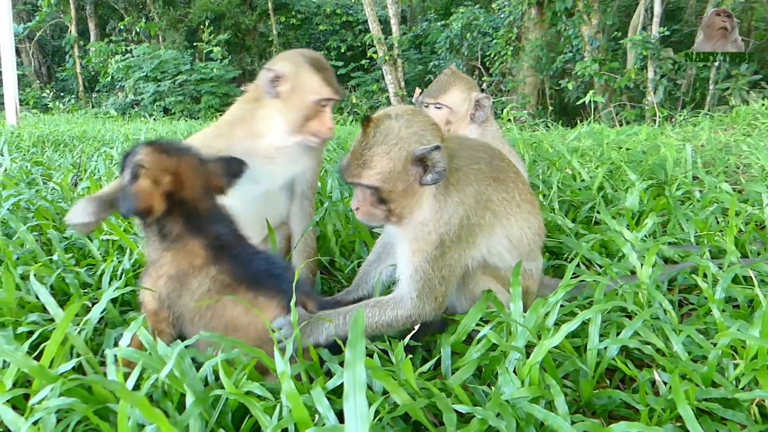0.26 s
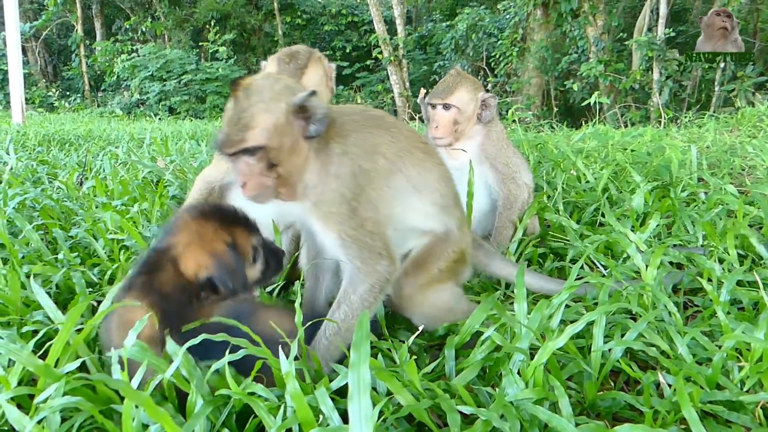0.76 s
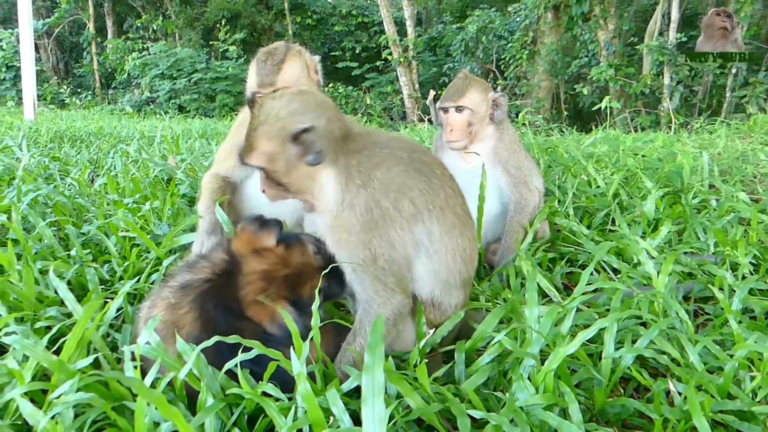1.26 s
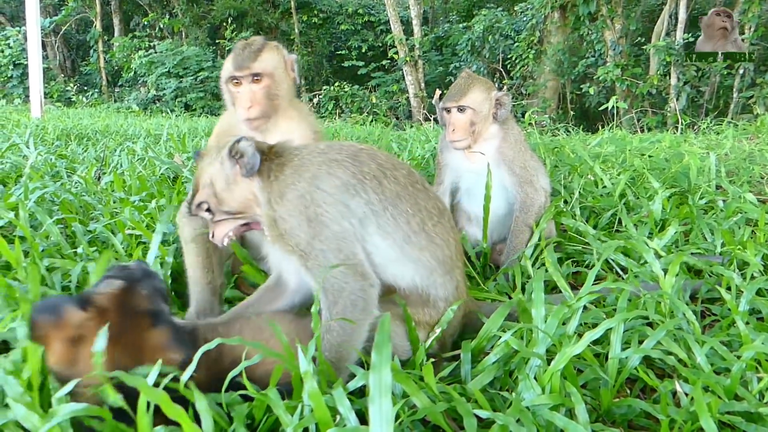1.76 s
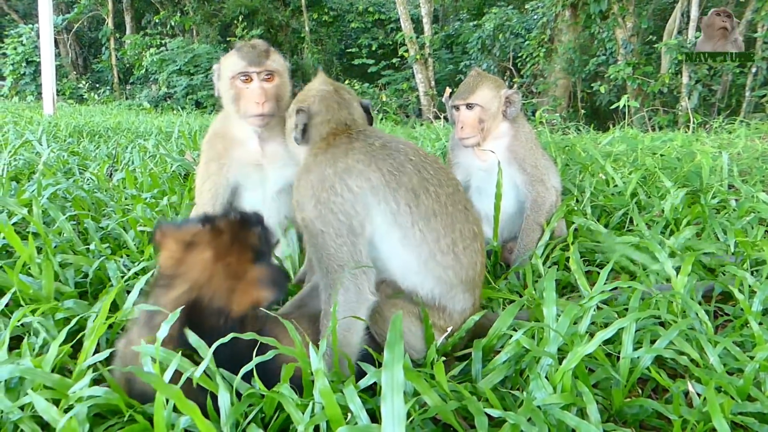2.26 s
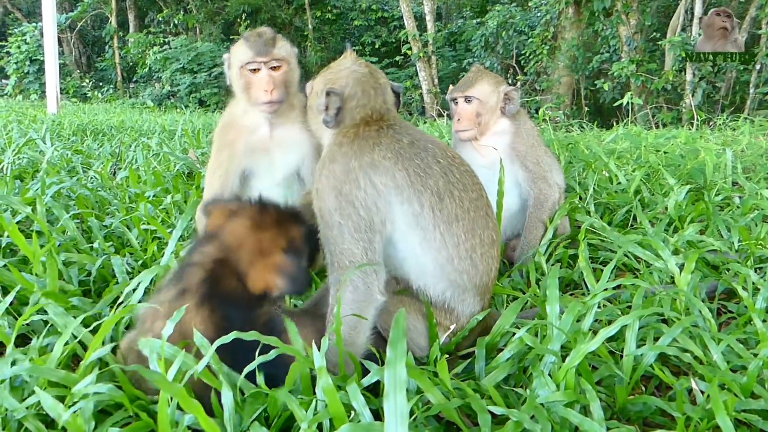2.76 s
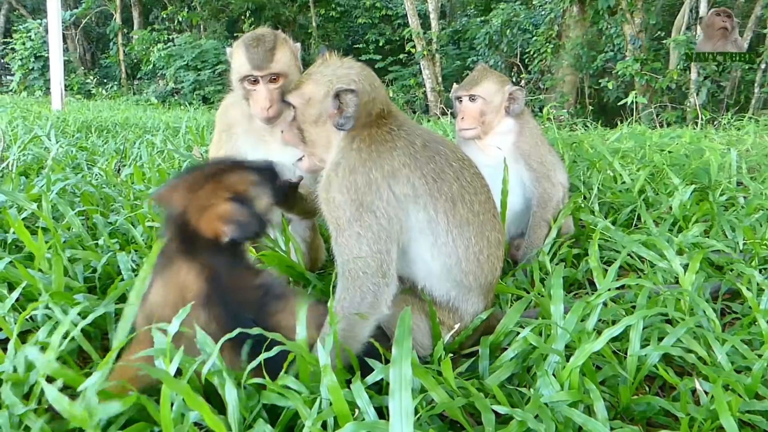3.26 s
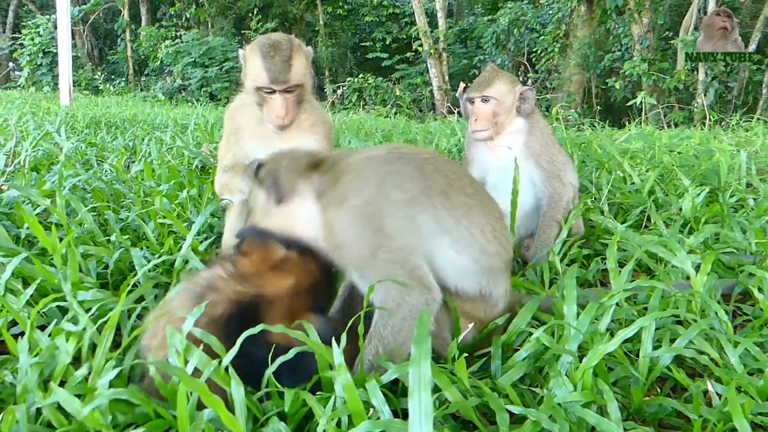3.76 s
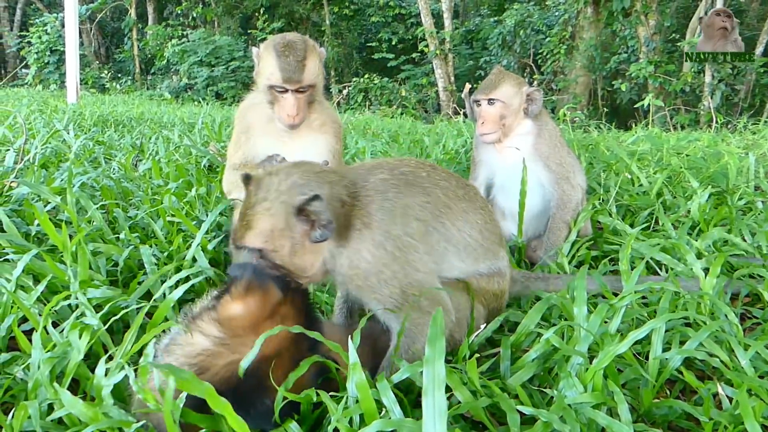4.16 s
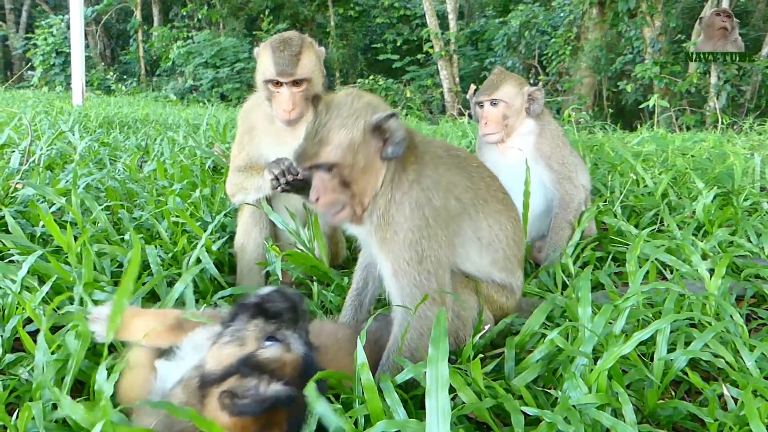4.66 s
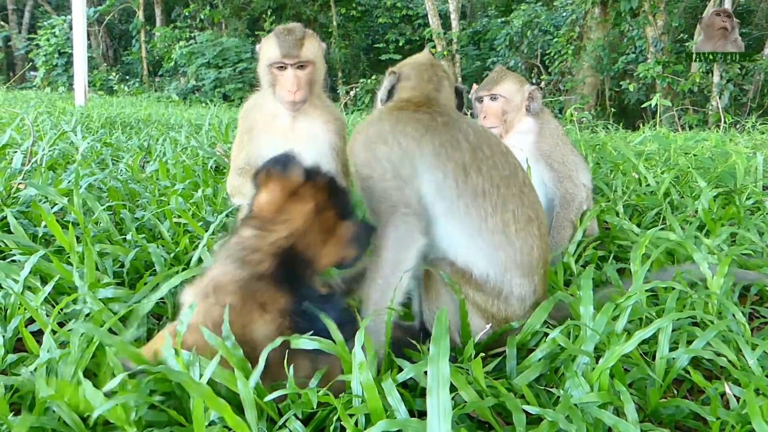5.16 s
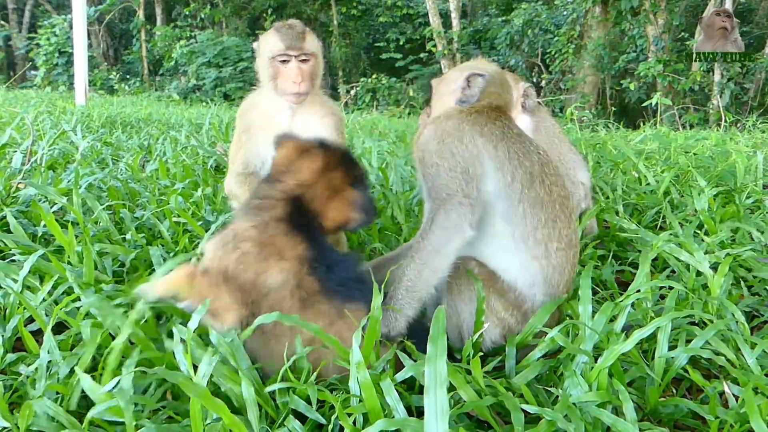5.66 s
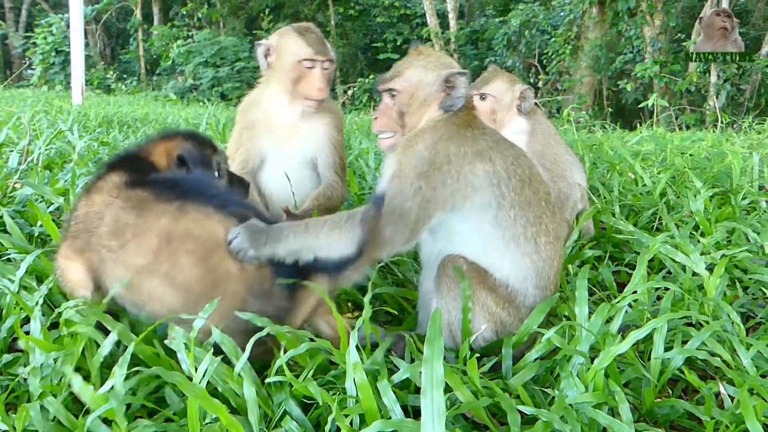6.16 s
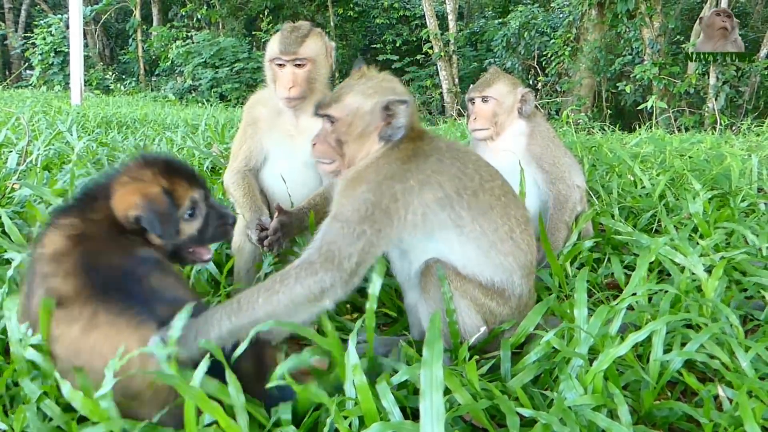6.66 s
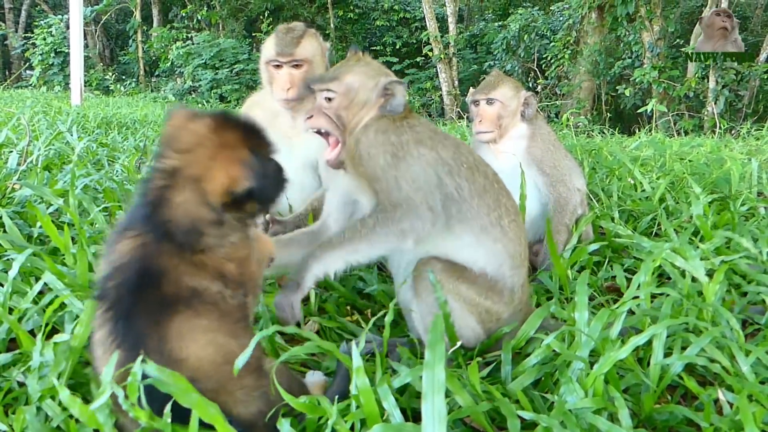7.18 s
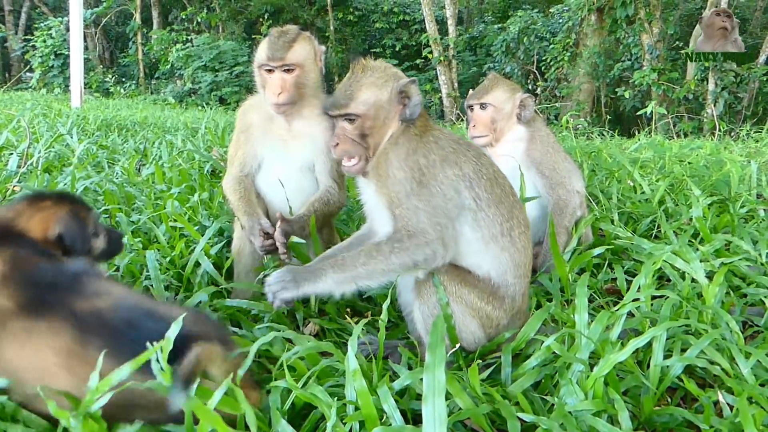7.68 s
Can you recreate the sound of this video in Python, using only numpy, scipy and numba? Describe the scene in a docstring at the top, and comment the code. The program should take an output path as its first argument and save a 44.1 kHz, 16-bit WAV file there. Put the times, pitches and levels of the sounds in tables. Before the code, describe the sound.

Close puppy moans, whines, growls and gives three sharp yelps in rustling grass, with motorbikes, a distant tooting horn and road rumble behind.

```python
"""Long grass before a belt of trees: a puppy tussling with monkeys whines, growls and yelps three times, close.
Its cries are vocal-fold pulses ringing throat, mouth and muzzle; the trees return them as scattered noise.
Beyond the trees, stacks of harmonics make motorbikes and a tooting horn, and shaped noise makes the road.
Noise bursts rustle the grass, narrow-band noise buzzes as insects, and a falling tone is one bird's peep.
The recorder's limiter clamps loud cries, so the background ducks after each yelp and swells back."""
import sys
import numpy as np
from scipy import signal
from scipy.fft import rfft, irfft
from scipy.io import wavfile
from scipy.ndimage import uniform_filter1d, minimum_filter1d
from numba import njit

SR = 44100
rng = np.random.default_rng(int(sys.argv[2]) if len(sys.argv) > 2 else 0)


def inscribe(sig):
    """Save sig as 16-bit PCM at rate SR to the path in sys.argv[1].

    A 1-D sig is mono; a 2-D sig holds one channel per row.
    Samples are clipped to [-1, 1] before scaling.
    """
    pcm = np.round(np.clip(np.atleast_2d(sig).T, -1, 1) * 32767)
    wavfile.write(sys.argv[1], SR, pcm.astype(np.int16))


N = 349260
T = np.arange(N) / SR  # seconds
FREQS = np.maximum(np.fft.rfftfreq(N, 1 / SR), 1)  # Hz, kept above zero for logarithms


def undb(db):
    """Decibels to gain."""
    return 10 ** (np.asarray(db) / 20)


def unit(x):
    """Scale to rms 1."""
    return x / np.sqrt(np.mean(x ** 2) + 1e-18)


def during(start, end):
    """The sample times from start to end."""
    return T[(T >= start) & (T <= end)]


def curves(rows, t):
    """The columns after the first, joined by straight lines and read at t (seconds or Hz)."""
    x, *columns = np.transpose(rows)
    return [np.interp(t, x, column) for column in columns]


def walk(rate, size=N):
    """Random wander with a spread near 1: straight lines between rate random knots a second."""
    position = np.arange(size) * rate / SR
    knots = np.arange(int(position[-1]) + 2)
    return 1.2 * np.interp(position, knots, rng.standard_normal(len(knots)))


def sine(hz):
    """Sine that follows a moving pitch."""
    return np.sin(2 * np.pi * np.cumsum(hz) / SR)


def colour(x, points):
    """Filter by a spectrum of (Hz, dB) points, joined over log frequency."""
    hz, db = np.transpose(points)
    gain = undb(np.interp(np.log(FREQS), np.log(hz), db))
    return irfft(rfft(x) * gain, N)


def butter(x, hz, kind, order):
    """Low-pass or high-pass."""
    return signal.sosfilt(signal.butter(order, hz, kind, fs=SR, output="sos"), x)


def place(x, pan_db):
    """Set a mono or stereo sound left or right: left minus right in dB."""
    return x * undb(np.array([[pan_db], [-pan_db]]) / 2)


@njit
def svf(x, hz, width):
    """State-variable band-pass with a moving centre, gain 1 there."""
    y, band, low = np.empty(len(x)), 0., 0.
    for i in range(len(x)):
        g, damping = np.tan(np.pi * hz[i] / SR), width / hz[i]
        v = (band + g * (x[i] - low)) / (1 + g * (g + damping))
        band, low, y[i] = 2 * v - band, low + 2 * g * v, damping * v
    return y


def resonate(x, hz, width):
    """One resonance, fixed or moving, its width in Hz."""
    return svf(x, hz + np.zeros(len(x)), float(width))


def trees(x, delay_s, t60_s, treble_hz):
    """Scattered echoes from trunks and leaves: decaying noise, partly different in the two channels."""
    t = np.arange(SR) / SR
    shared, left, right = rng.standard_normal((3, SR))
    fade = np.clip((t - delay_s) / 0.0062, 0, 1) * undb(-60 * t / t60_s)
    scatter = (shared + .5 * np.array([left, right])) * fade
    tail = butter(scatter, treble_hz, "low", order=1)
    return signal.fftconvolve(x[None], unit(tail) / np.sqrt(SR), axes=1)[:, :N]


def outdoors(flicker_db=1.0):
    """Road rumble and tyre roar under an even hiss of leaves, all bands of one wide noise."""
    # Spectrum of the place. Each row: frequency in Hz, relative level in dB.
    place_spectrum = [(15, -59), (25, -39.5), (145, -2), (170, -3.5), (285, -7), (363, -5), (463, -11),
                      (695, -16.5), (1260, -22), (4030, -29.5), (5200, -30.5), (7700, -41.5), (11200, -37),
                      (14700, -52.5), (16000, -51)]
    # Passing road noise. Each row: time in seconds, rumble in dB, tyre roar in dB.
    traffic = [(0, 6, -5.5), (2.9, 2.5, -3), (4.3, 0, 0.5), (4.65, -2, -6.5), (5.6, 0.5, -3.5),
               (6.4, 3, -4), (7.92, 3, -3)]
    mid, side = (colour(x, place_spectrum) for x in rng.standard_normal((2, N)))
    side = colour(side, [(40, -7), (130, -11.5), (350, -8), (700, -8.5),
                         (2000, -6.0), (5000, -12.5), (10000, -5.5)])
    air = unit(mid + side * np.array([[1], [-1]])) * undb(-36)
    # split near 250 Hz and 900 Hz; the roar is what lies between
    rumble = irfft(rfft(air) / (1 + (FREQS / 250) ** 4), N)
    hiss = irfft(rfft(air) / (1 + (900 / FREQS) ** 4), N)
    roar = place(air - rumble - hiss, pan_db=2.5)
    rumble_db, roar_db = curves(traffic, T)
    road = rumble * undb(rumble_db + flicker_db * walk(30)) + roar * undb(roar_db + 1.8 * walk(36))
    return road + place(hiss, pan_db=-0.3) * undb(1.5 + 0.34 * walk(5.8))


def hum(pitch_hz=55.2, level_db=-64.5):
    """A faint low tone whose pitch wavers slightly."""
    return np.sqrt(2) * undb(level_db) * sine(pitch_hz * (1 + 0.03 * walk(13)))


def insects(width_hz=800, throb_db=4.5, octave_db=-3, octave_width_hz=2600):
    """A far chorus throbs in one narrow band; one nearer insect swells once and brings out the octave."""
    band_hz, chorus_db = 4750, -56
    buzz_s, buzz_half_s, buzz_db = 0.55, 0.13, -54.5  # the nearer one: middle, half length, level

    def rasp(hz, width):
        noise = resonate(resonate(rng.standard_normal(N), hz, width), hz, width)
        return unit(noise) * undb(throb_db * walk(45))

    # one rasp for each channel and one in both
    chorus = np.array([rasp(band_hz, width_hz) for _ in range(2)]) + rasp(band_hz, width_hz)
    near = rasp(band_hz, octave_width_hz / 2) + undb(octave_db) * rasp(2 * band_hz, octave_width_hz)
    swell = np.exp(-((T - buzz_s) / buzz_half_s) ** 4)
    return unit(chorus) * undb(chorus_db) + near * undb(buzz_db) * swell


def exhaust(note_hz, rider, flutter_db=2.0):
    """Harmonics of the firing rate, each flickering in level; the engine is louder as the revs rise."""
    # Exhaust spectrum. Each row: multiple of the firing rate, relative level in dB.
    firing_harmonics = [(4, -13), (5, -7), (6, 3.5), (7, -6.5), (8, -4.5), (9, -6), (10, -8), (11, -5),
                        (12, -9), (13, -23), (15, -14.5)]
    emerge_db_per_s, throttle_db_per_octave = 30, 12
    out_s, level_db, recede_db_per_s = rider
    behind_trees_db = emerge_db_per_s * np.maximum(out_s - T, 0)
    receding_db = recede_db_per_s * np.maximum(T - out_s, 0)
    throttle_db = throttle_db_per_octave * np.log2(note_hz / np.mean(note_hz))
    # the exhaust note is six times the firing rate
    firing = 2 * np.pi * np.cumsum(note_hz * (1 + .006 * walk(25))) / (6 * SR)
    stack = sum(undb(gain_db + flutter_db * walk(16))
                * np.sin(round(k) * firing + 2 * np.pi * rng.random())
                for k, gain_db in firing_harmonics)
    return unit(stack) * undb(level_db - behind_trees_db - receding_db + throttle_db)


def motorbikes():
    """One rider works the throttle, a second cruises in late, and a steadier engine further off fades away."""
    # Throttle of the first bike. Each row: time in seconds, exhaust note in Hz.
    throttle = [(1.35, 153.3), (1.95, 183.7), (2.25, 164.4), (2.56, 191.2), (3.4, 192.5), (3.73, 178.5),
                (4.13, 190.4), (4.5, 175.1), (4.93, 182.9), (5.8, 174.3), (6.49, 172.6), (7.26, 149.6),
                (7.72, 168.7), (7.92, 162.9)]
    # Both bikes come out from behind the trees, then draw away.
    # Each row: seconds when out, level then in dB, loss after that in dB per second.
    riders = [(1.6, -33.5, 1.15), (6.85, -38.5, 1.5)]
    # Tones of the steadier engine. Each row: frequency in Hz, level in dB.
    far_tones = [(123.8, -49.5), (209.9, -53), (355.3, -50), (425.3, -51)]
    # Its run. Each row: time in seconds, relative speed, added level in dB.
    far_run = [(0, 0.96, 4.5), (.6, 1, 3), (1.2, 0.99, 3.5), (1.7, 0.88, -6), (7.92, 0.97, -25)]
    speed, far_db = curves(far_run, T)
    far = sum(undb(gain_db + 3.8 * walk(7.42)) * sine(hz * speed * (1 + 0.0075 * walk(20)))
              for hz, gain_db in far_tones)
    (note_hz,) = curves(throttle, T)
    first = exhaust(note_hz, riders[0])
    second = exhaust(187.2, riders[1])  # a steady note in Hz
    return place(first + second + np.sqrt(2) * far * undb(far_db), pan_db=1.5)


def grass(spike_db=7, crackle_db=8, spread=0.6):
    """Blades swish past each other in swells, and crackle with tiny ticks where they bend."""
    # Bodies brushing through. Each row: middle in seconds, half length in seconds, swish in dB, crackle in dB.
    rustles = [(0.082, 0.11, -51, -67), (.6, 0.47, -49, -62), (0.95, 0.097, -55, -51),
               (1.42, 0.042, -56, -64), (1.85, .1, -59, -61), (2.5, .08, -63, -56), (2.93, 0.036, -52, -49),
               (3.36, 0.048, -61, -55), (3.641, .045, -54, -56), (4.72, .15, -58, -55),
               (5.15, 0.07, -46, -54), (5.28, .05, -42, -50), (5.64, .07, -42, -51),
               (5.77, 0.037, -60, -53), (6.25, 0.17, -53, -54.5), (7.02, .07, -53, -55),
               (7.445, 0.089, -54, -46.5), (7.883, 0.28, -49, -49)]

    def swell(s, half, db):  # in power, so that overlapping rustles add
        return undb(2 * db) * np.exp(-2 * ((T - s) / half) ** 2)

    def ticks(depth_db, spectrum):
        noise = rng.standard_normal((3, N)) * undb(depth_db * np.tanh(walk(900)))
        return unit(colour(noise[0] + spread * noise[1:], spectrum))

    swish = ticks(spike_db, [(300, -13), (1500, 0.5), (3000, 1.5), (5500, -4), (7500, -13.5), (15000, -28)])
    crackle = ticks(crackle_db, [(1000, -7), (5000, 0), (7500, -4), (11000, -3.5), (15000, -9.5)])
    stir = undb(-74.5 + 16 * np.tanh(walk(2.7)))  # faint stirring throughout, heard in between
    swishing = np.sqrt(sum(swell(s, half, db) for s, half, db, _ in rustles))
    crackling = np.sqrt(sum(swell(s, half, db) for s, half, _, db in rustles))
    return swish * swishing + crackle * (crackling + stir)


def horn(waver_db=3.5, echo_db=-4.0, attack_s=0.015, release_s=0.029):
    """A distant electric horn: a rattling diaphragm whose harmonics near 4 kHz stand out and linger in the trees."""
    # Each row: start in seconds, end in seconds, pitch in Hz, level in dB,
    # then the seventh, eighth and tenth harmonics in dB on the scale of the diaphragm's.
    toots = [(4.093, 4.336, 431.6, -39.5, -9, -1, -4), (4.592, 4.864, 426, -42, -13, -4, -4.5),
             (4.856, 4.899, 429.6, -31.5, -13, -11, -11), (5.105, 5.26, 432, -41, -12, -5, -11),
             (5.259, 5.387, 430.5, -41, -4, -1, -1), (5.58, 5.704, 432.4, -41, -10, 0, -4),
             (7.268, 7.37, 431, -36.5, -2, -5, -3), (7.372, 7.433, 428, -38.5, -23, -4, -9)]
    # The diaphragm's other harmonics. Each row: harmonic number, relative level in dB.
    diaphragm = [(1, -8.5), (9, 0.5), (11, -16), (18, -23), (19, -30), (21, -16.5)]
    out = np.zeros(N)
    for start, end, pitch_hz, db, seventh_db, eighth_db, tenth_db in toots:
        on = (T > start) & (T < end + release_s)
        t = T[on]
        hz = pitch_hz * (1 + .011 * walk(500, len(t)) + .002 * walk(25, len(t)))
        phase = 2 * np.pi * np.cumsum(hz) / SR
        harmonics = diaphragm + [(7, seventh_db), (8, eighth_db), (10, tenth_db)]
        buzz = sum(undb(gain_db + waver_db * walk(130.3, len(t))) * np.sin(round(k) * phase)
                   for k, gain_db in harmonics)
        envelope = np.clip(np.minimum((t - start) / attack_s, 1 + (end - t) / release_s), 0, 1)
        out[on] += unit(buzz) * undb(db) * envelope
    lingering = colour(out, [(1000, -3), (3000, -5), (3430, -4), (3870, 1.5), (4300, -2), (9000, 0)])
    return out + undb(echo_db) * trees(lingering, delay_s=0.0024, t60_s=1.34, treble_hz=7350)


def folds(hz, rough):
    """Vocal folds: sharp pulses, uneven and alternately strong and weak when rough, with air noise once a cycle."""
    split_db = 9  # gap between strong and weak pulses at full roughness
    air_floor, air_noise = .07, .6  # air in even a clear cry, and what full roughness adds
    size = len(hz)
    cycles = np.cumsum(hz * (1 + .2 * rough * walk(1400, size))) / SR
    count = np.round(cycles).astype(int)
    offset = (cycles - count) * SR / hz  # samples from the nearest closure
    pulses = np.sinc(offset) * np.exp(-(offset / 4) ** 2)
    uneven_db = 3.5 * rng.standard_normal(size)[count]
    strength = undb(rough * (uneven_db + split_db * (count % 2 - .5)))
    air = rng.standard_normal(size) * (.4 + .6 * np.cos(np.pi * cycles) ** 2)
    return pulses * strength * np.sqrt(SR / hz) + (air_floor + air_noise * rough) * air


def utter(voice, t, db):
    """Level a voice, give it its loudness contour with 2 ms edges, and set it at its time."""
    power = uniform_filter1d(voice ** 2, size=300)
    edges = np.clip(np.minimum(t - t[0], t[-1] - t) / .002, 0, 1)
    return np.interp(T, t, voice / np.sqrt(power + 1e-12) * undb(db) * edges)


def cry(rows, muzzle, mouth_width_hz, throat_hz, throat_width_hz, throat_db, edge_hz, leak_db):
    """Fold pulses ring the throat, the moving mouth and the muzzle; little gets out above edge_hz."""
    t = during(rows[0][0], rows[-1][0])
    hz, db, rough, mouth_hz, bright_db, shift = curves(rows, t)
    source = folds(hz, np.clip(rough, 0, 1))

    def cavity(centre_hz, width_hz, second_width_hz):
        return resonate(resonate(source, centre_hz, width_hz), centre_hz, second_width_hz)

    throat = undb(throat_db) * cavity(throat_hz, throat_width_hz, 620)
    mouth = cavity(mouth_hz, mouth_width_hz, 840)
    upper = sum(undb(gain_db) * cavity(f * shift, width, 780) for f, width, gain_db in muzzle)
    voice = mouth - throat + undb(bright_db) * upper
    leak = undb(leak_db) * butter(source, 10000, "low", order=2)
    return utter(butter(voice, edge_hz, "low", order=14) + leak, t, db)


def growl():
    """Ragged closed-mouth pulses in the throat that quicken under the snarl."""
    # Each row: time in seconds, level in dB, throat resonance in Hz, pulse rate in Hz.
    growling = [(4.73, -53, 282, 139.4), (4.745, -27, 279, 142), (4.768, -33.5, 350, 154.7),
                (4.785, -31, 473, 165.5), (4.813, -28.5, 596, 199.4), (4.835, -26.5, 453, 224.7),
                (4.855, -25.5, 324, 295), (4.881, -31.5, 290, 292), (4.897, -54, 290, 248)]
    t = during(growling[0][0], growling[-1][0])
    db, throat_hz, hz = curves(growling, t)
    pulses = folds(hz, rough=0.824)
    return utter(resonate(resonate(pulses, throat_hz, 180), throat_hz, 270), t, db)


def puppy():
    """A moan breaks upward into a whine; a snarl over a growl and three yelps follow."""
    # Cries close to the microphone. Each row: time in seconds, pitch in Hz, level in dB, roughness 0-1,
    # mouth resonance in Hz, upper resonances in dB, their tuning as a ratio.
    moan_rows = [(4.270, 437, -50, 0.61, 1600, -1, 1), (4.286, 422, -27.5, .33, 1620, -1, 0.88),
                 (4.298, 417, -22, 0.1, 1530, -4, 0.94), (4.318, 408, -20, .11, 1550, -3.5, 0.97),
                 (4.335, 425, -14, .1, 1670, -7, 0.95), (4.365, 462.5, -19, 0.074, 1820, -1.5, 0.94),
                 (4.385, 501, -20, 0.11, 1910, -4, 0.91), (4.396, 545, -17, 0.2, 1720, 1, 0.89),
                 (4.404, 580, -16, 0.64, 1680, -8, 1)]  # climbs and breaks into the whine
    whine_rows = [(4.398, 672, -20, 0.16, 1810, -1, 0.82), (4.408, 709, -19.5, 0, 1900, -4, 1),
                  (4.44, 715, -17.5, 0.05, 1830, -5.5, 0.96), (4.462, 701.5, -17, 0.02, 1820, -1, 0.98),
                  (4.484, 743.5, -16, 0.03, 1720, -2.5, 1), (4.516, 754.3, -15.5, 0.01, 1720, 2, 0.93),
                  (4.542, 735.4, -19, 0.05, 1600, 5.5, 0.9), (4.556, 685, -19, 0.6, 1530, -18, 0.97),
                  (4.568, 578, -32, 0.4, 1380, -12, 0.92), (4.578, 500, -42, 0.6, 1250, -12, .95)]  # clear and level, then sags and roughens
    snarl_rows = [(4.794, 413, -52, .6, 1700, -6, 1), (4.805, 399, -30.5, 0.65, 1640, -2, 0.96),
                  (4.822, 370.5, -31.5, 0.57, 1600, -8, 0.91), (4.832, 304.4, -28, 0.64, 1500, -8, 1),
                  (4.843, 298.4, -20, 0.48, 1481, -12, 0.92), (4.861, 304.4, -21.5, 0.49, 1620, -15, 0.86),
                  (4.875, 298, -30, .8, 1920, -16, 1), (4.889, 282, -51, 0.75, 1900, -12, 0.91)]  # low, harsh pulses through the open mouth
    yelp_1_rows = [(5.0095, 689, -12, .64, 1790, -10, 0.96), (5.0115, 738, -18, .9, 1780, -7, .9),
                   (5.02, 765.5, -6, 0.87, 1900, -12.5, 1.03), (5.038, 840, 2, 0.61, 1820, -5.5, 0.94),
                   (5.047, 876, -2, 0.11, 1800, -5, 0.92), (5.064, 924, 1.5, 0.077, 1860, -9.5, 0.94),
                   (5.068, 1100, -13, .2, 1730, -3, 1), (5.076, 1118, -8, .05, 1710, -9, 1.01),
                   (5.086, 1015, -8.5, .08, 1760, -10, .97), (5.097, 820, -13.5, 0.46, 1530, -6, 1.05),
                   (5.106, 740, -16, .25, 1510, -13, 1.1), (5.118, 620, -37, .3, 1250, -18, 1)]
    yelp_2_rows = [(5.5095, 346, -6, 0.16, 1550, -8, 0.7), (5.516, 372, -29, 0.12, 1550, -11, 0.94),
                   (5.5185, 432, -19, 0.33, 1660, -9, 0.96), (5.526, 542, -4, 0.24, 1690, -6.5, 1.02),
                   (5.541, 632, -8.5, .13, 1690, -3, 1.13), (5.547, 695, -9, .5, 1590, -4, 1.02),
                   (5.555, 792, -5, .2, 1700, 5.5, 0.97), (5.559, 880, 1, .04, 1820, -7.5, 1.17),
                   (5.575, 897, -5.5, 0.03, 1770, -3, 0.965), (5.584, 854, -5.5, .02, 1590, -5, 1.04),
                   (5.593, 690, -18, .08, 1380, -6, 1.5), (5.609, 493, -37, .15, 1050, -18, 1)]
    yelp_3_rows = [(6.894, 380, -31, 0.53, 1600, -10, 1), (6.9035, 420, -21, 0.43, 1590, -6, 0.86),
                   (6.906, 470, -15.5, 0.2, 1850, -6, 1.03), (6.918, 618, -15, 0.62, 2220, -2.5, .92),
                   (6.925, 727, -1, .3, 2120, -5, 0.97), (6.929, 844, -10.5, .13, 1920, 4, 1.17),
                   (6.937, 899, -4, .04, 1900, 0.5, 0.92), (6.949, 943, -4.5, .015, 1910, -4.5, 1.04),
                   (6.96, 937, -11, .02, 1840, -3.5, 1.03), (6.967, 854, -15.5, .08, 1570, 5, 0.92),
                   (6.974, 760, -15, .05, 1450, -19, 1), (6.981, 648, -17.5, .1, 1310, -18, .9),
                   (6.986, 585, -34, .15, 1400, -10, 1.3), (7.001, 450, -33, .15, 1200, -14, 1)]
    # Upper resonances of the muzzle, set anew for each cry. Each row: centre in Hz, width in Hz, gain in dB.
    muzzles = {"moan": [(2530, 360, -15), (3820, 200, -3), (4630, 1200, -13), (5540, 340, -12)],
               "whine": [(3045, 140, -1.5), (3660, 190, -5), (5050, 180, -9), (6850, 940, -18.5)],
               "snarl": [(2440, 290, 0), (3120, 390, -4), (4500, 620, -1.5), (6900, 890, -7.5)],
               "yelp 1": [(2771, 110, 3), (3290, 610, 1), (4610, 960, -0.5), (5120, 790, -2),
               (6100, 260, -3.5)], "yelp 2": [(2570, 550, 2.5), (3400, 365, 1.5), (4170, 400, -17),
               (5330, 330, -3.5), (6150, 230, -9), (7100, 340, -8)], "yelp 3": [(2810, 260, -1),
               (3530, 190, -2), (4470, 180, -2), (5720, 500, -7), (6900, 500, -3.5)]}
    moan = cry(moan_rows, muzzles["moan"], mouth_width_hz=270, throat_hz=404, throat_width_hz=130,
               throat_db=-12.5, edge_hz=7700, leak_db=-49)
    whine = cry(whine_rows, muzzles["whine"], mouth_width_hz=300, throat_hz=691, throat_width_hz=47,
                throat_db=-14, edge_hz=6900, leak_db=-47.0)
    snarl = cry(snarl_rows, muzzles["snarl"], mouth_width_hz=730, throat_hz=330, throat_width_hz=330,
                throat_db=-7.5, edge_hz=7500, leak_db=-38)
    first = cry(yelp_1_rows, muzzles["yelp 1"], mouth_width_hz=520, throat_hz=830, throat_width_hz=2000,
                throat_db=-19.0, edge_hz=6900, leak_db=-43.5)
    second = cry(yelp_2_rows, muzzles["yelp 2"], mouth_width_hz=760, throat_hz=730, throat_width_hz=170,
                 throat_db=-13.5, edge_hz=6800, leak_db=-42.5)
    third = cry(yelp_3_rows, muzzles["yelp 3"], mouth_width_hz=540, throat_hz=1110, throat_width_hz=2100,
                throat_db=-11.5, edge_hz=6500, leak_db=-41.0)
    return moan + whine + snarl + growl() + first + second + third


def ports(x):
    """A near source reaches the two microphone ports with slightly different phase and level."""
    # Each row: frequency in Hz, phase in radians by which left leads.
    port_phase = [(0, 0), (700, 0.45), (1700, 0.25), (4200, 0.33), (6000, 0.32), (12000, .5)]
    # Each row: frequency in Hz, left minus right in dB.
    port_balance = [(100, .5), (380, 3.9), (900, .5), (2400, .3), (6000, .5)]
    (radians,), (db,) = curves(port_phase, FREQS), curves(port_balance, FREQS)
    half = np.array([[.5], [-.5]])
    return irfft(rfft(x) * undb(half * db) * np.exp(1j * half * radians), N)


def echoes(pup):
    """The cries come back blurred by the grass, scattered by the wood, and once distinctly from the tree line."""
    # What the leaves throw back. Each row: frequency in Hz, gain in dB.
    leaves = [(400, -18), (1200, -51), (1850, -5), (2630, -6), (2850, 0.5), (3200, -5), (4700, -1.5),
              (7000, 4)]
    # How strongly the voice reaches the wood. Each row: time in seconds, gain in dB.
    facing = [(5.6, 1), (6.9, -0.5)]
    (facing_db,) = curves(facing, T)
    scattered = colour(pup * undb(facing_db), leaves)
    # the long grass around the puppy blurs each cry
    blades = undb(-21) * trees(pup, delay_s=.001, t60_s=.06, treble_hz=6000)
    # the edge of the wood answers first, the trunks behind it linger
    early = undb(-23.5) * trees(scattered, delay_s=.04, t60_s=.35, treble_hz=9000)
    late = undb(-35.5) * trees(scattered, delay_s=0.06, t60_s=1.0, treble_hz=4000)
    slap_s, slap_db, slap_hz = .088, -42, 1870  # the distinct echo: delay, gain, band
    slap = undb(slap_db) * np.interp(T - slap_s, T, resonate(pup, slap_hz, 700), left=0)
    return blades + early + late + slap


def bird(taper_db=11):
    """One thin falling peep that swells and fades."""
    start_s, length_s = 7.797, .06
    peep_hz, peep_db, drop_hz_per_s = 6050, -42, 1870  # pitch at the start, level in the middle
    t = during(start_s, start_s + length_s)
    hz = (peep_hz - drop_hz_per_s * (t - t[0])) * (1 + 0.0094 * walk(270, len(t)))
    return utter(sine(hz), t, peep_db - taper_db * np.linspace(-1, 1, len(t)) ** 2)


def scene():
    """The puppy in front with its echoes, everything else around and behind it."""
    background = butter(outdoors(), 53, "high", order=3) + hum() + insects() + motorbikes() + grass() + horn()
    pup = puppy()
    return background + ports(pup) + echoes(pup) + bird()


def record(dry, ceiling_db=-14, release_db_per_s=70, attack_s=0.00026):
    """A limiter clamps loud cries, holds briefly and lets the background swell back; then the top is cut."""
    # Colour of the microphone in its housing. Each row: frequency in Hz, gain in dB.
    microphone = [(600, -1), (750, -0.5), (930, -3), (1200, 0), (1600, -0.5), (3900, -1.37), (4700, -3),
                  (5600, -2), (7000, 0)]
    heard = colour(dry, microphone)
    power = uniform_filter1d(heard.mean(axis=0) ** 2, size=180)
    loudest = -minimum_filter1d(-np.abs(power), size=2001, origin=1000)  # of the last 45 ms: the hold
    over_db = np.maximum(10 * np.log10(loudest + 1e-12) - ceiling_db, 0)
    # falls no faster than the release
    held_db = np.maximum.accumulate(over_db + release_db_per_s * T) - release_db_per_s * T
    pole = np.exp(-1 / (attack_s * SR))
    reduction_db = signal.lfilter([1 - pole], [1, -pole], held_db)
    limited = heard * undb(-reduction_db)
    top_hz = 15700
    return signal.sosfilt(signal.ellip(10, .2, 90, top_hz, fs=SR, output="sos"), limited)


dry = scene()
out = record(dry)
inscribe(out)
```